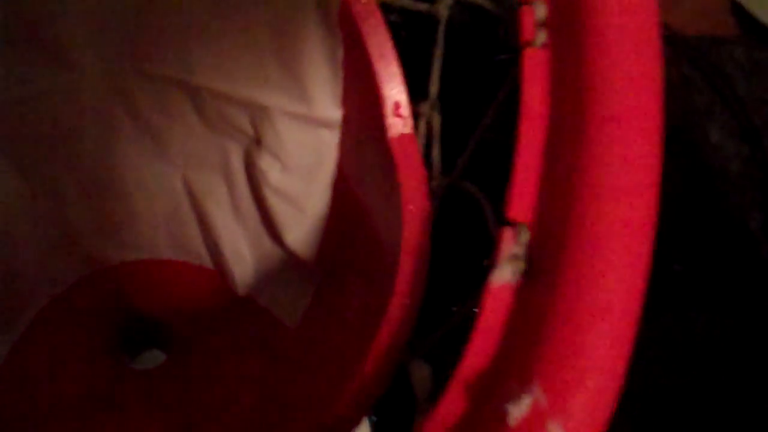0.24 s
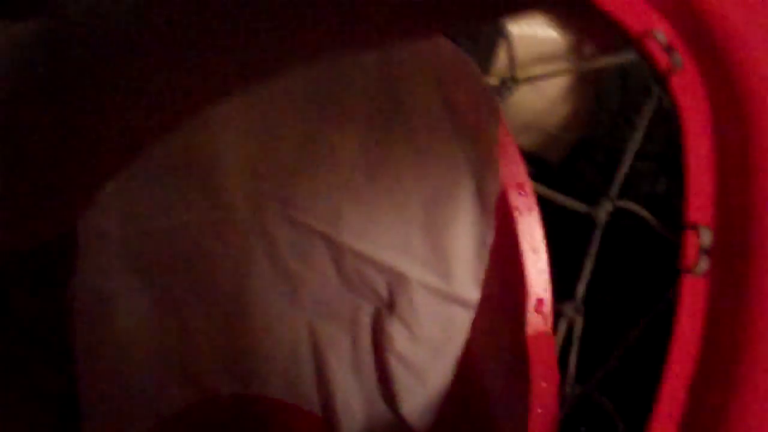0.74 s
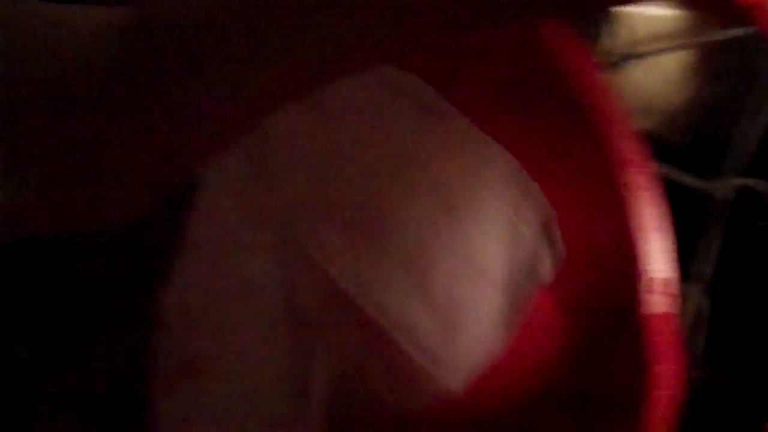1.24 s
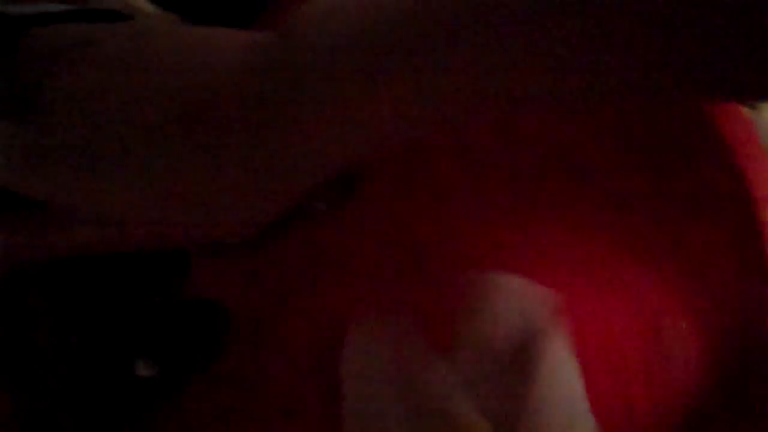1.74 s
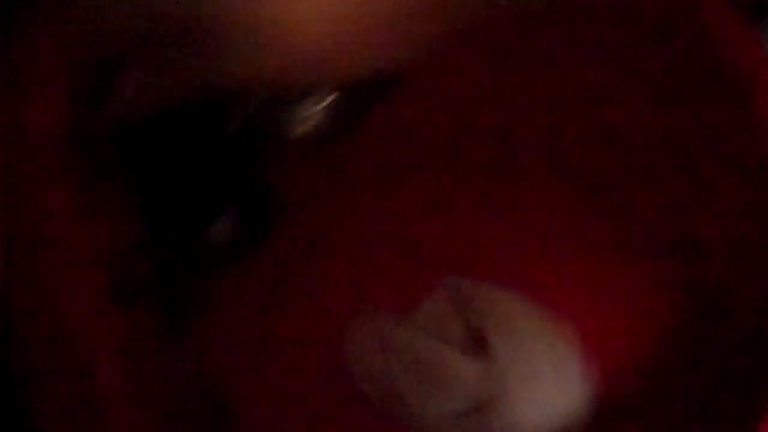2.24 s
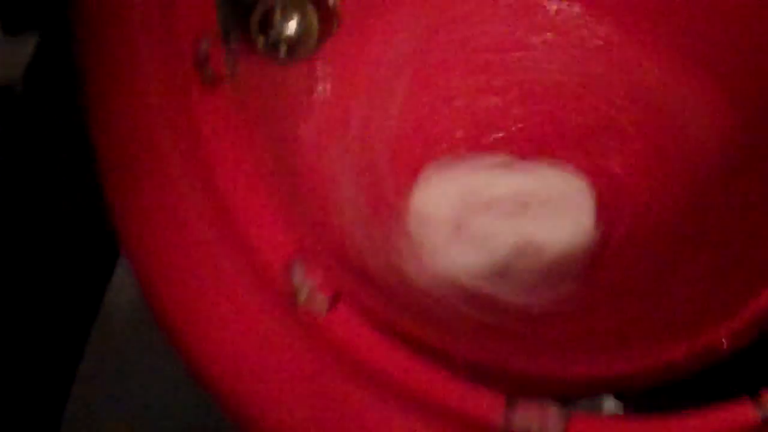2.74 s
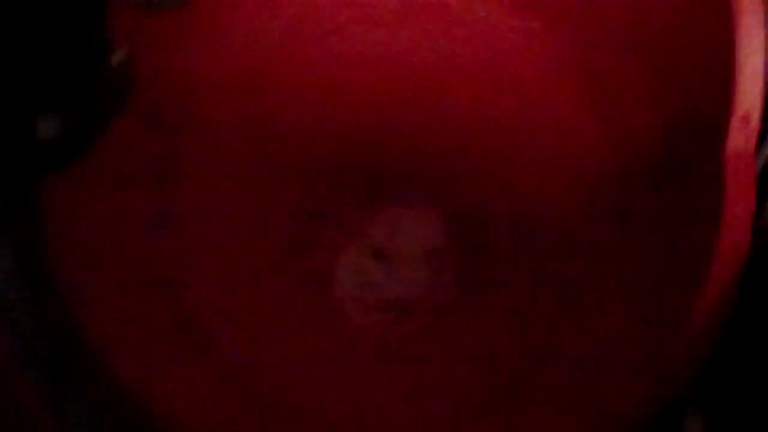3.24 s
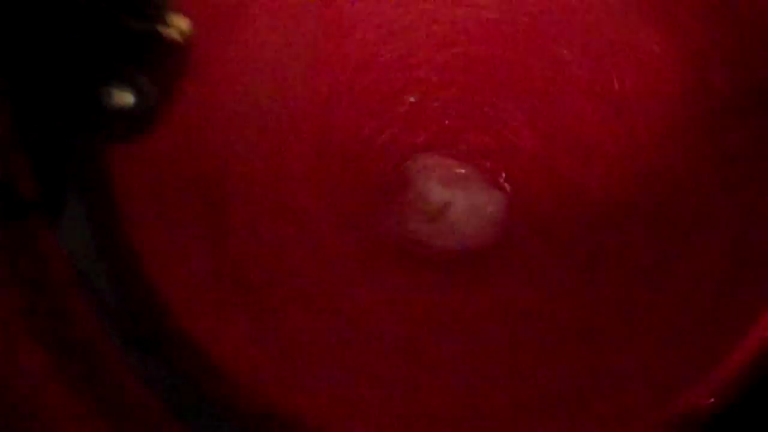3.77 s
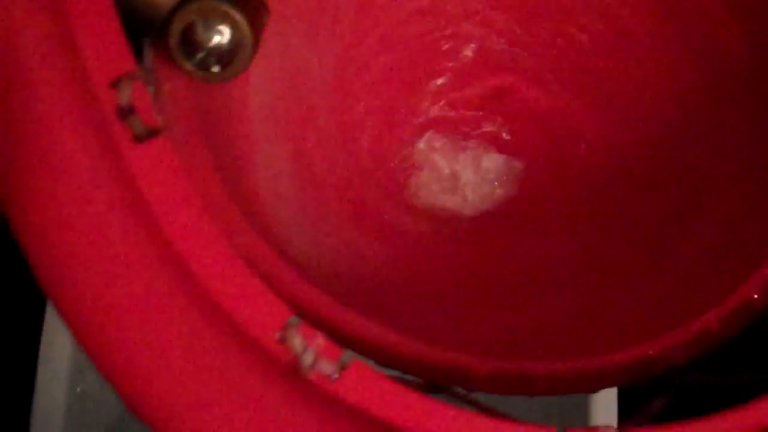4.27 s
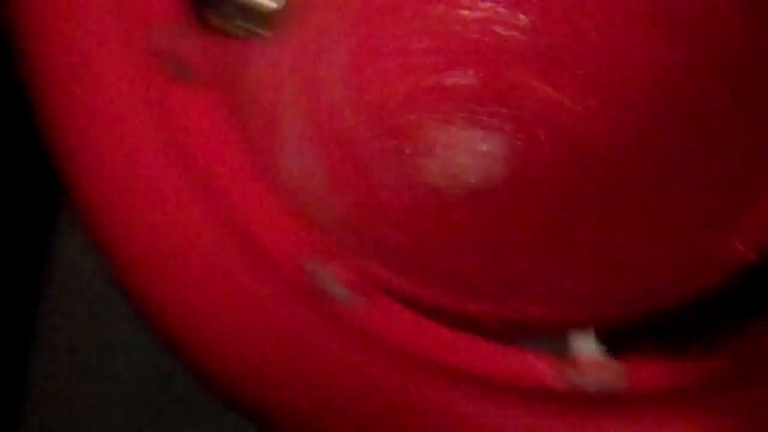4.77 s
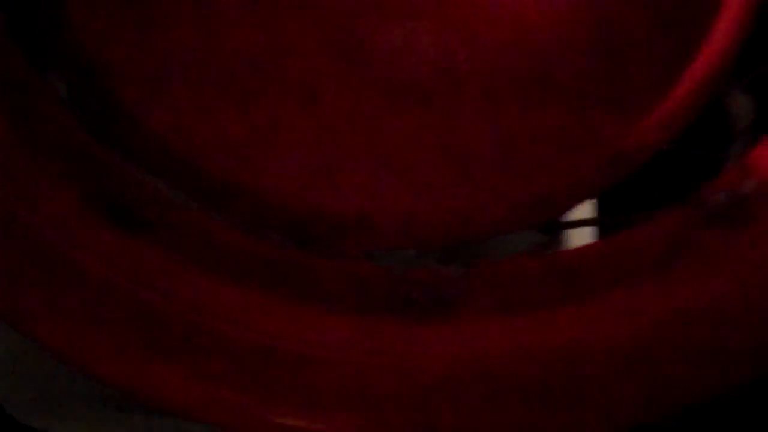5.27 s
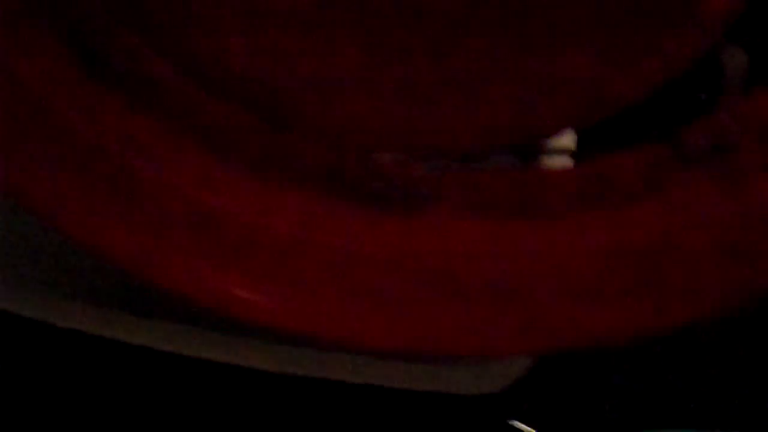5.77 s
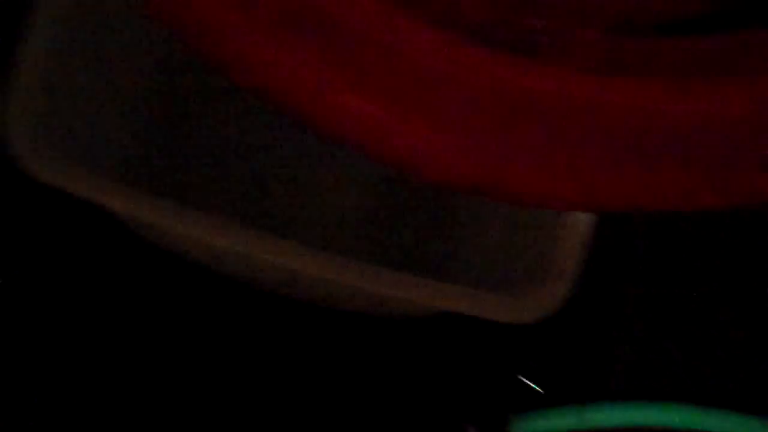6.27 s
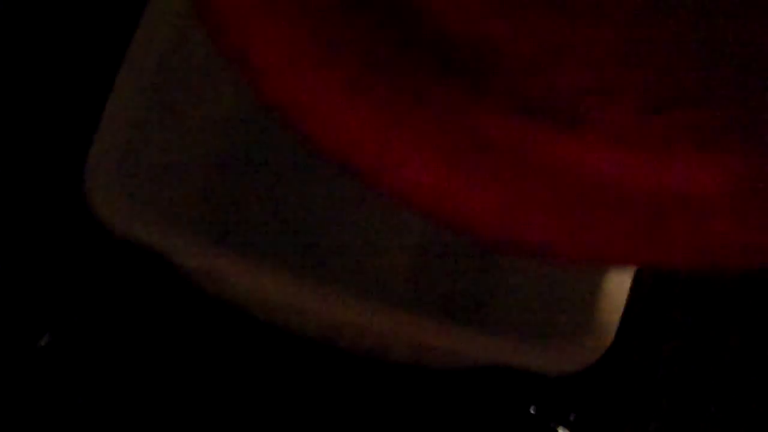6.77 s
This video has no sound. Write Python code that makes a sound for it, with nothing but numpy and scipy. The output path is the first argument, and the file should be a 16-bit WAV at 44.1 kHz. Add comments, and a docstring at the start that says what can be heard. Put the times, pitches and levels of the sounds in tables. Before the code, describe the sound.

From 0 to 0.75 s, water drips into a tub: irregular bright ticks, small splashes, short rising bubble bloops around 0.23-0.33 s and 0.7 s, and a brief wall ring near 0.58 s, over a thin trickle and low rumble. A faint high cricket makes triple chirps at 0.06 and 0.5 s. At about 0.8 s a flush jet bursts in with quick spurts and swirls round a small plastic bowl: dense, bright, fizzing hiss with hollow, shifting resonance and a quieter gurgle below. It stays fairly steady, swelling slightly around 3.1 and 5 s. At 5.9 s it shuts off sharply, leaving a weak draining hiss that fades. Drips return from 6 s, crowding together after 6.4 s, with strong snaps at 6.71 and 6.82 s, bubble plinks, and the trickle, rumble and hum swelling back until the end at 7 s. Close stereo microphone, small room with short echoes, treble spread wide.

```python
"""First water trickles and drips into a tub: noisy ticks, gliding sine bubbles, a ringing wall; a cricket chirps outside.
Then a flush jet swirls round a small plastic bowl: fizzing bubble grains through resonances and a shifting echo,
with a gurgle below, while the low background of filtered noise and wavering tones sinks.
At the end the jet collapses to a draining hiss, the background swells back and the drips return.
A hand-held stereo microphone hears it all close by."""
import sys
import numpy as np
from scipy import signal
from scipy.fft import rfft, irfft
from scipy.io import wavfile
from scipy.ndimage import uniform_filter1d

SR = 44100
rng = np.random.default_rng(int(sys.argv[2]) if len(sys.argv) > 2 else 0)


def master_out(mix):
    """Clip the mix to full scale and print it as 16-bit PCM to the path in sys.argv[1]."""
    frames = np.transpose(np.atleast_2d(mix))
    ceiling = np.clip(frames, -1, 1)
    pcm = np.round(ceiling * 32767).astype(np.int16)
    wavfile.write(sys.argv[1], SR, pcm)


N = 309141
TIME = np.arange(N) / SR  # s


def gain_of(db):
    """Turns decibels into an amplitude factor."""
    return 10 ** (np.asarray(db) / 20)


def evened(x):
    """Scales a signal to rms 1."""
    return x / np.sqrt(np.mean(x ** 2) + 1e-20)


def read(points, hz):
    """Reads a curve over frequency, straight between points on a log axis."""
    f, value = np.transpose(points)
    return np.interp(np.log(hz + 1), np.log(f + 1), value)


def along(rows, t):
    """Reads each column of a table over time."""
    s, *columns = np.transpose(rows)
    return [np.interp(t, s, c) for c in columns]


def add(mix, s, sound):
    """Lays a sound into the mix at s seconds, cut at the end."""
    part = mix[round(s * SR):][:len(sound)]
    part += sound[:len(part)]


def played(table, sound):
    """Plays all events of one table on one track."""
    track = np.zeros(N)
    for s, *settings in table:
        add(track, s, sound(*settings))
    return track


def coloured(x, points):
    """Filters x by a fixed spectral curve, rms 1."""
    return evened(irfft(rfft(x) * gain_of(read(points, np.fft.rfftfreq(N, 1 / SR))), N))


def drift(width_s):
    """Slow chance: noise smoothed twice over width_s, rms 1."""
    width = int(width_s * SR)
    smooth = uniform_filter1d(rng.standard_normal(N), width)
    return evened(uniform_filter1d(smooth, width))


def fizz(per_s, spread_db, cycles, low_hz, high_hz, noise_db, count=30):
    """Tiny bubbles of many sizes burst at random, unequal in strength, over hiss; spectrum flattened."""
    strength_db = spread_db * np.minimum(rng.exponential(1, N), 5)
    bursts = gain_of(strength_db) * (rng.random(N) < per_s / SR)
    kind = rng.integers(0, count, N)
    bubbles = np.zeros(N)
    for k, hz in enumerate(np.geomspace(low_hz, high_hz, count)):
        turns = np.arange(0, 3 * cycles, hz / SR)
        tone = np.sin(2 * np.pi * turns * (1 + 0.0078 * turns))  # the pitch creeps up
        grain = tone * np.exp(-2 * turns / cycles) * np.minimum(turns, 1)
        bubbles += signal.oaconvolve(bursts * (kind == k), grain * hz / np.linalg.norm(grain))[:N]
    spectrum = rfft(bubbles)
    power = abs(spectrum) ** 2
    flat = spectrum / np.sqrt(uniform_filter1d(power, 4000) + 0.0015 * np.mean(power))
    return evened(evened(irfft(flat, N)) + gain_of(noise_db) * rng.standard_normal(N))


# resonances of the bowl, first the drain's, then the body's: f/Hz, width [Hz], level/dB
BOWL_MODES = [
    [(1307, 163, 5), (1700, 194, 5)],
    [(2340, 690, 2), (2750, 270, 3.5), (3500, 100, -0.5), (4800, 470, -2.5)],
]
# what the moving microphone hears of the bowl:
# t/s, level/dB added to the drain's ringing, delay of the far wall's echo [ms], echo strength [0-1]
MICROPHONE_VIEW = [(.82, 9, .68, .08), (1.0, 9, .72, .08), (1.2, 11, .795, .14), (1.5, 9.5, .825, .36),
                   (1.9, 8.5, .826, .33), (2.2, 8, .806, .32), (2.4, 4, .83, .38), (2.7, 1.5, .842, .4),
                   (3.1, 2, .878, .36), (3.25, 3, .91, .22), (3.55, 2.5, .886, .22), (4.0, 4, .925, .22),
                   (4.15, 3, .952, .28), (4.85, 3.4, .943, .34), (5.2, 6, .845, .34), (5.33, 7, .858, .32),
                   (5.5, 7, .824, .42), (5.95, 6, .814, .42)]
ECHO_FROM_HZ, ECHO_TO_HZ = 2000, 7500


def in_bowl(spray):
    """The bowl's modes ring; the far wall's echo combs the sound, shifting as the microphone moves."""
    hz, t, z = signal.stft(spray, SR, nperseg=512, noverlap=384)
    hz = hz[:, None]
    drain_db, delay_ms, strength = along(MICROPHONE_VIEW, t)
    power = 1
    for modes, ring_db in zip(BOWL_MODES, [drain_db, 0]):
        for f, width, db in modes:
            power = power + gain_of(db + ring_db) ** 2 / (1 + (2 * (hz - f) / width) ** 2) ** 1.3
    echo_band = 1 + (ECHO_FROM_HZ / (hz + 1)) ** 4 + (hz / ECHO_TO_HZ) ** 6
    echo = strength * np.exp(-2j * np.pi * hz * delay_ms / 1000) / echo_band
    power = power / abs(1 - echo) ** 2  # it bounces to and fro
    before = (abs(z) ** 2).mean(1)[:, None]
    power = power * before.sum() / (power * before).sum(0)  # colour changes, loudness stays
    # random patches of louder and softer bands, some quick, some slow
    quick, slow = rng.standard_normal((2,) + z.shape)
    quick = evened(uniform_filter1d(uniform_filter1d(quick, 6, 0), 15, 1))
    slow = uniform_filter1d(slow, 3, 0)
    slow = evened(uniform_filter1d(uniform_filter1d(slow, 80, 1), 80, 1))
    z = z * np.sqrt(power) * gain_of(1.25 * quick + 0.7 * slow)
    return signal.istft(z, SR, nperseg=512, noverlap=384)[1][:N]


# colour of the spray: f/Hz, level/dB per Hz
SPRAY_COLOUR = [(400, -21.5), (700, -12.5), (860, -17), (1100, -10.5), (1500, -11.5), (2000, -2),
                (3000, -0.5), (4200, 0), (7400, -1.5), (10500, -9.5), (12100, -14.5), (14400, -30)]


def spray():
    """The sputtering jet breaks into dense fizz, which rings in the bowl."""
    sputter = gain_of(0.48 * drift(0.05) + 0.67 * drift(0.007))
    jet = fizz(6000, spread_db=3.0, cycles=9.2, low_hz=800, high_hz=13770, noise_db=4.0)
    return in_bowl(coloured(jet, SPRAY_COLOUR) * sputter)


# spray from the valve opening to its closing: t/s, level/dB
SPRAY_LEVEL = [(.75, -40), (.795, -36.5), (.805, -29), (.83, -21), (.93, -19.5), (.97, -21), (1.08, -22),
               (1.21, -24.5), (2.17, -22), (2.48, -21.5), (3.03, -22), (3.12, -20.5), (3.18, -25),
               (3.8, -24.5), (3.86, -21.5), (3.98, -25.5), (4.22, -26), (4.95, -22), (4.99, -23),
               (5.43, -21.5), (5.49, -24.5), (5.91, -25)]
# short spurts on top: t/s, level/dB
SPURTS = [(.801, -22), (.823, -17.5), (0.835, -25), (0.848, -18), (.864, -22), (.888, -23), (.899, -22),
          (0.91, -21), (.925, -26), (1.014, -19), (1.108, -29)]
SPURT_S, LONGER_SPURT_PER_DB, USUAL_SPURT_DB = 0.0045, 0.03, -23
SHUT_DB_PER_S = -105  # the jet collapses
DRAINING_DB, TAIL_DB_PER_S = -11, -29.5  # a weaker hiss of water draining off the wall dies away


def flow():
    """Strength of the jet: it opens, spurts, then collapses to a draining hiss."""
    level = np.clip((TIME - SPRAY_LEVEL[0][0]) / 0.021, 0, 1) * gain_of(along(SPRAY_LEVEL, TIME)[0])
    for s, db in SPURTS:
        decay_s = SPURT_S * np.exp(LONGER_SPURT_PER_DB * (db - USUAL_SPURT_DB))
        u = np.arange(0, 6, 1 / (SR * decay_s))
        add(level, s, gain_of(db) * np.minimum(4 * u, 1) * np.exp(-u))
    shut = np.maximum(TIME - SPRAY_LEVEL[-1][0], 0)  # s since closing
    collapse = gain_of(SHUT_DB_PER_S * shut)
    draining = gain_of(DRAINING_DB + TAIL_DB_PER_S * shut)
    return level * np.maximum(collapse, draining)


# colour of the gurgle: f/Hz, level/dB per Hz
GURGLE_COLOUR = [(53, -63), (90, -28.5), (238, -3), (275, -7.5), (420, 1), (505, 1), (841, -12.5),
                 (900, -41), (1170, -7), (1980, -120)]
# the gurgle through the flush: t/s, level/dB
GURGLE_LEVEL = [(0.78, -36), (0.82, -30), (1.13, -39), (1.88, -35), (2.71, -42.5), (3.86, -42), (4.3, -49),
                (4.5, -45.5), (5.11, -41.5), (5.93, -44.5), (6.2, -59.5)]
GURGLE_SWELL_DB = 0.5


def gurgle():
    """Larger, sparser bubbles glug below the spray."""
    bubbles = fizz(500, spread_db=-1.0, cycles=4.1, low_hz=151.3, high_hz=900, noise_db=5.5)
    level = gain_of(along(GURGLE_LEVEL, TIME)[0] + GURGLE_SWELL_DB * drift(0.065))
    onset = np.clip((TIME - GURGLE_LEVEL[0][0]) / 0.039, 0, 1)
    return onset * level * coloured(bubbles, GURGLE_COLOUR)


def flush():
    """The jet drives the spray in the bowl, with its gurgle."""
    return flow() * spray() + gurgle()


# colour of a drop's tick: f/Hz, level/dB per Hz
TICK_COLOUR = [(500, -10), (1500, -8), (3000, -7.5), (5500, -3), (8000, -8.5), (10500, -12.5), (14400, -46)]
# the clearer drops landing: t/s, splash level/dB, rough splash f/Hz, tick level/dB on the splash before halving
DROPS = [(0.0124, -21, 3700, -16), (0.0294, -20.5, 2700, -19), (0.0567, -22, 3700, -21),
         (0.084, -33.5, 2450, 8.5), (0.131, -31.5, 4200, 2.5), (0.181, -18.5, 4800, -12),
         (0.2299, -34, 2820, -2), (0.2636, -24.5, 3570, -4), (0.3584, -28, 2600, -5),
         (0.402, -29, 4260, -7), (0.4224, -19.5, 3100, -9), (0.4474, -40, 2060, 11),
         (0.5791, -20.5, 2790, -9), (0.627, -18.5, 3590, -1.5), (0.6938, -27, 2720, -24),
         (0.7427, -21, 2700, -25), (6.0157, -25, 6350, 4.5), (6.1637, -26, 5100, -11),
         (6.2073, -44, 2090, 18), (6.2547, -25.5, 5470, -7), (6.333, -25, 3020, -6),
         (6.342, -43, 2200, 20.5), (6.3673, -18.5, 4200, -8), (6.419, -25, 3500, 5.5),
         (6.4227, -17, 2710, -11), (6.4685, -20, 3900, -13), (6.4854, -33, 3280, 6),
         (6.5113, -23.5, 2210, -5), (6.5221, -15, 4100, -12), (6.577, -20.5, 2930, -6),
         (6.5977, -28, 3500, 3), (6.627, -23, 3680, -15), (6.6333, -19.5, 3600, -12), (6.661, -22, 2780, 0),
         (6.6742, -19, 3960, -16), (6.682, -18, 3040, -10), (6.6967, -20, 2630, -9),
         (6.7141, -11.5, 2720, -23), (6.761, -21.5, 6900, -4), (6.767, -20, 2520, -14),
         (6.7979, -22, 4960, -18), (6.8026, -21, 2890, -16), (6.812, -28, 2580, -18),
         (6.8195, -16.5, 5220, -3.5), (6.8304, -36, 3730, 14), (6.8797, -22, 3830, -19),
         (6.8865, -16.5, 2920, -24), (6.8974, -20, 2680, -13), (6.928, -24, 3500, -3.5),
         (6.9337, -13.5, 2840, -20), (6.9494, -31, 2860, -1), (6.9774, -35, 4330, -4),
         (6.9964, -27, 2230, -9)]
SPLASH_T60_S, LONGER_SPLASH_PER_DB, USUAL_DROP_DB = 0.019, 0.02, -25
TICK_T60_S = 0.017


def drop(db, hz, tick_db):
    """A broad tick, and a short splash round one wobbling, rising pitch."""
    t = np.arange(2048) / SR
    t60 = SPLASH_T60_S * np.exp(LONGER_SPLASH_PER_DB * (db - USUAL_DROP_DB))
    tick, wobble = rng.standard_normal((2, 2048))
    wobble = 0.08 * evened(uniform_filter1d(wobble, 30))
    pitch = hz * (1 + wobble + 3.0 * t - 0.18 * np.exp(-t / 0.0011))
    splash = np.sin(2 * np.pi * np.cumsum(pitch) / SR) * np.minimum(t / 0.0025, 1)
    tick = rfft(tick) * gain_of(read(TICK_COLOUR, np.fft.rfftfreq(2048, 1 / SR)))
    tick = evened(irfft(tick)) * np.minimum(t / 0.0002, 1)
    return gain_of(db) * (splash * gain_of(-60 * t / t60) + tick / 2 * gain_of(tick_db - 60 * t / TICK_T60_S))


# sharp snaps of a large drop on the wall: t/s, peak level/dB, f/Hz
SNAPS = [(.422, -21, 3040), (.627, -23, 4800), (6.418, -25, 2500), (6.675, -27, 3500), (6.7143, -9, 2580),
         (6.8188, -11, 2520)]


def snap(db, hz):
    """Little more than one swing, with no net push."""
    turns = np.arange(0, 5, hz / SR)
    push = np.sin(2 * np.pi * turns) * np.exp(-turns / 0.71) * np.minimum(2 * turns, 1)
    swing = np.gradient(push)
    return gain_of(db) * swing / abs(swing).max()


# bubbles: t/s, level/dB at the top of the rise, start f/Hz, f/Hz glided towards, rise [s], t60 [s]
BUBBLES = [(.231, -24, 793, 890, 0.0023, 0.098), (.281, -21.5, 1050, 1580, .007, 0.038),
           (.292, -26, 535, 800, 0.0037, 0.092), (.311, -16.5, 900, 1390, 0.015, 0.019),
           (.697, -22, 953, 1770, 0.022, 0.12), (6.343, -23, 1740, 1890, .002, 0.033),
           (6.596, -31, 1520, 1580, 0.0035, 0.078), (6.719, -25, 1133, 1490, 0.005, 0.104),
           (6.726, -30, 2630, 3700, 0.0095, 0.031), (6.738, -30, 4470, 4420, 0.0034, 0.026),
           (6.818, -10.5, 1700, 1760, 0.0003, 0.0062), (6.906, -28.5, 1540, 1940, 0.0025, 0.063),
           (6.933, -33, 2800, 2850, .003, 0.038), (6.95, -29.5, 800, 1000, 0.0011, 0.041)]


def bubble(db, start_hz, end_hz, rise, t60):
    """A near sine that glides as the bubble nears the surface; its level and pitch waver slightly at random."""
    t = np.arange(0, rise + t60, 1 / SR)
    flutter, wobble = (evened(uniform_filter1d(v, 120))[:len(t)] for v in rng.standard_normal((2, 14000)))
    glide = np.minimum(t / (rise + t60 / 4), 1.2)  # overshoots by up to a fifth
    hz = start_hz + (end_hz - start_hz) * glide
    shape = np.where(t < rise, (t / rise) ** 1.03, gain_of(-60 * (t - rise) / t60))
    tone = np.sin(2 * np.pi * np.cumsum(hz * (1 + 0.0091 * wobble)) / SR)
    return gain_of(db + 0.77 * flutter) * shape * tone


# modes of the tub's wall, lower then upper: f/Hz, t60 [s]
TUB_MODES = [(977, .3), (1290, .05)]
# drops that set the tub ringing: t/s, lower mode level/dB, upper mode level/dB
KNOCKS = [(.334, -52, -34), (.474, -45, -23.5), (.58, -25.5, -30), (6.418, -30.5, -30), (6.519, -31, -44),
          (6.694, -36, -45), (6.997, -42, -20.5)]
TUB_RISE_S = 0.0027
DAMPED_AFTER_S, DAMPING_DB_PER_S = 0.042, -700  # then the sloshing water stills the wall


def knock(*mode_db):
    """The tub's modes swell for a moment and die away."""
    t = np.arange(12000) / SR
    flutter = evened(uniform_filter1d(rng.standard_normal(len(t)), 120))
    ring = sum(gain_of(db - 60 * t / t60) * np.sin(2 * np.pi * hz * t)
               for db, (hz, t60) in zip(mode_db, TUB_MODES))
    damping_db = DAMPING_DB_PER_S * np.maximum(t - DAMPED_AFTER_S, 0)
    return gain_of(1.2 * flutter + damping_db) * np.minimum(t / TUB_RISE_S, 1) * ring


def tub(x):
    """Short dense echoes inside the tub and the small room."""
    t = np.arange(9000) / SR
    tail = rng.standard_normal(9000) * gain_of(-60 * t / 0.12) * (t > 0.002)
    tail = signal.lfilter([1], [1, -0.5], tail)  # the walls swallow treble
    return signal.oaconvolve(x, tail / np.linalg.norm(tail))[:N]


# cricket chirps: t/s, level/dB
CHIRPS = [(.057, -37), (.492, -38.5)]
WING_HZ, WING_SAG = 4400, 0.075  # each stroke starts here and sags by this share
STROKE_S, STROKE_EVERY_S = 0.031, 0.045


def chirp(db):
    """Three wing strokes, each a falling tone in two throbs with its echo off a wall."""
    u = np.arange(0, 1, 1 / (SR * STROKE_S))
    tone = np.sin(2 * np.pi * np.cumsum(WING_HZ * (1 - WING_SAG * u)) / SR)
    throbs = np.sin(np.pi * u) ** 1.1 * (1 - 1.2 * np.exp(-((u - 0.68) / 0.08) ** 2))
    stroke = gain_of(db) * tone * throbs
    out = np.zeros(SR // 4)
    for k in range(3):
        add(out, k * STROKE_EVERY_S, np.concatenate([stroke, gain_of(-11.0) * stroke]))
    return out


# colour of the smallest drops: f/Hz, level/dB per Hz
SPLATTER_COLOUR = [(900, -36), (1700, 4), (2800, -1.5), (4500, 0.5), (6500, -13.5), (10000, -38),
                   (14400, -60)]
# their strength: t/s, level/dB
SPLATTER_LEVEL = [(0, -42), (.8, -59), (1.0, -62), (5.95, -33), (6.25, -53), (6.45, -52), (6.7, -41),
                  (7.01, -40)]


def splatter():
    """The smallest drops: sparse, long-ringing grains with little hiss."""
    drops = fizz(220, spread_db=3.8, cycles=11.0, low_hz=1300, high_hz=7000, noise_db=-8.0, count=14)
    return gain_of(along(SPLATTER_LEVEL, TIME)[0]) * coloured(drops, SPLATTER_COLOUR)


SINK_FROM_S, SINK_S, BACK_FROM_S, BACK_S = 0.83, 0.29, 6.2, 0.42


def sinking(db, change_db):
    """A level in dB that sinks as the flush starts and swells back after it."""
    down, back = (TIME - SINK_FROM_S) / SINK_S, (TIME - BACK_FROM_S) / BACK_S
    return db + change_db * np.clip(np.minimum(down, 1 - back), 0, 1)


# colour of the trickle: f/Hz, level/dB per Hz
TRICKLE_COLOUR = [(120, -37), (200, -11.5), (402, -7), (966, -0.5), (1570, -8.5), (2010, -13.5),
                  (4190, -21), (5300, -28), (6670, -35), (8570, -30.5), (10600, -43), (14400, -58)]


def trickle():
    """The wash of a thin stream: bubble grains blurred into hiss."""
    wash = fizz(700, spread_db=4.5, cycles=6.1, low_hz=597, high_hz=8940, noise_db=5.5, count=14)
    return gain_of(sinking(-37, -12.5) + 1.4 * drift(0.02)) * coloured(wash, TRICKLE_COLOUR)


# colour of the rumble: f/Hz, level/dB per Hz
RUMBLE_COLOUR = [(12, -33), (20, -3), (65, -7.5), (92, 0), (118, -14), (140, -4.5), (204, -3.5),
                 (226, -8.5), (300, -2.5), (390, -29), (660, -120)]
RUMBLE_GROWS_DB_PER_S = 0.33


def rumble():
    """Low filtered noise, uneven and slowly growing."""
    level_db = sinking(-49, -13) + RUMBLE_GROWS_DB_PER_S * TIME + 2.5 * drift(0.062)
    return gain_of(level_db) * coloured(rng.standard_normal(N), RUMBLE_COLOUR)


def waver(hz, width_hz):
    """A low tone whose pitch and strength wander."""
    pitch = hz + width_hz / 2 * drift(0.043)
    return np.sqrt(2) * gain_of(1.3 * drift(0.036)) * np.sin(2 * np.pi * np.cumsum(pitch) / SR)


# the hum: t/s, level/dB
HUM_LEVEL = [(0, -58), (.8, -72), (4.3, -94), (5.95, -62), (6.2, -63), (6.45, -51), (7.01, -49)]


def low_tones():
    """A widely wavering throb and a steadier hum above it."""
    throb = gain_of(sinking(-52.5, -34)) * waver(53, width_hz=23)
    hum = gain_of(along(HUM_LEVEL, TIME)[0]) * waver(119, width_hz=1.6)
    return throb + hum


def background():
    """Splatter and trickle over rumble, throb and hum."""
    return splatter() + trickle() + rumble() + low_tones()


def scene():
    """Flush, drips, tones and background, the drips and tones echoing; both channels alike."""
    drips = played(DROPS, drop) + played(SNAPS, snap)
    tones = played(BUBBLES, bubble) + played(KNOCKS, knock) + played(CHIRPS, chirp)
    echoes = tub(gain_of(-11.0) * drips + gain_of(-9.5) * tones)
    air = flush() + drips + tones + echoes + background()
    return np.array([air, air])


# how alike left and right are: f/Hz, likeness [-1 to 1]
LIKENESS = [(60, 0.92), (110, 1), (200, 0.97), (370, 1.0), (690, 0.96), (1270, 0.93), (2340, 0.85),
            (4300, 0.51), (7920, 0.099), (14600, -0.33)]
# left over right, beyond the overall lean: f/Hz, level/dB
LEFT_TILT = [(60, -0.5), (290, -0.8), (630, -1), (1400, -0.3), (3000, -0.5), (5500, 2), (8000, -3),
             (14000, -2.5)]
LEFT_OVER_RIGHT_DB, BAND_EDGE_HZ = 4, 14300


def record(dry):
    """Two close ports, alike in the bass; in the treble random phase turns spread the sound wide; band limited."""
    hz, t, z = signal.stft(dry, SR, nperseg=256)
    turn = rng.standard_normal(z.shape[1:])
    turn = evened(uniform_filter1d(uniform_filter1d(turn, 4, 0), 3, 1))
    sides = np.array([1, -1])[:, None, None]  # left, right
    angle = np.arccos(np.clip(read(LIKENESS, hz), -0.5, 0.999))
    apart = np.tan(angle / 2)[:, None] * 1j * np.tanh(8.1 * turn)
    lean_db = read(LEFT_TILT, hz)[:, None] + LEFT_OVER_RIGHT_DB
    ports = gain_of(sides * lean_db / 2) * (1 + sides * apart)
    heard = signal.istft(z * ports, SR, nperseg=256)[1][:, :N]
    band_limit = signal.firwin(511, BAND_EDGE_HZ, window=("kaiser", 9), fs=SR)
    return signal.oaconvolve(heard, band_limit[None], "same")


dry = scene()
out = record(dry)
master_out(out)
```